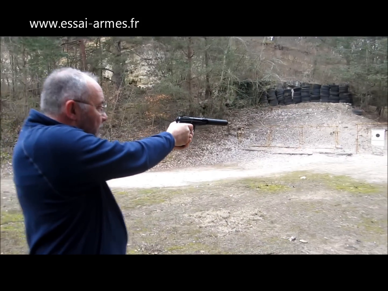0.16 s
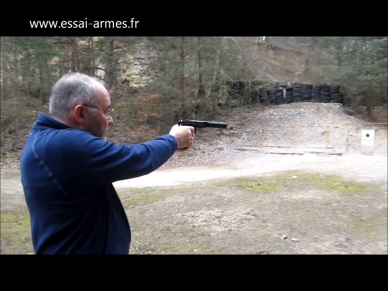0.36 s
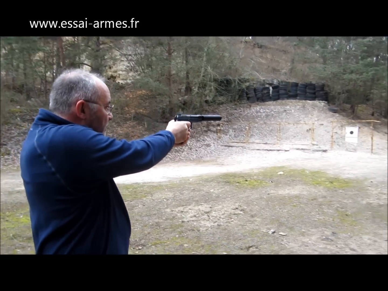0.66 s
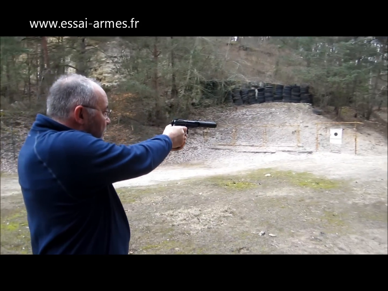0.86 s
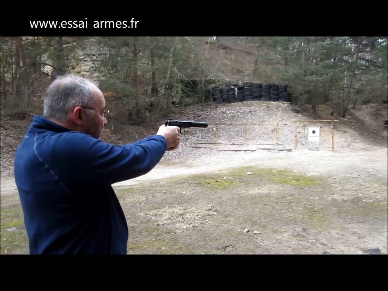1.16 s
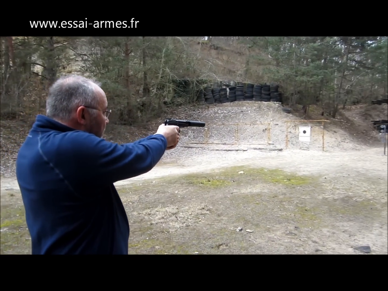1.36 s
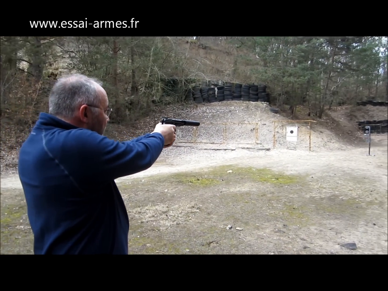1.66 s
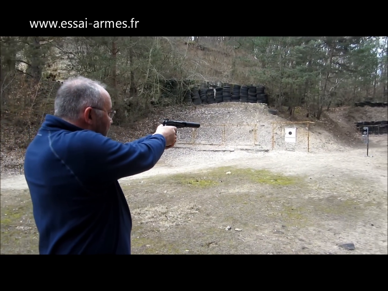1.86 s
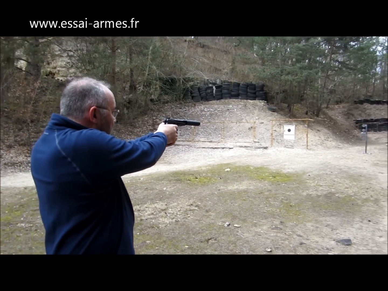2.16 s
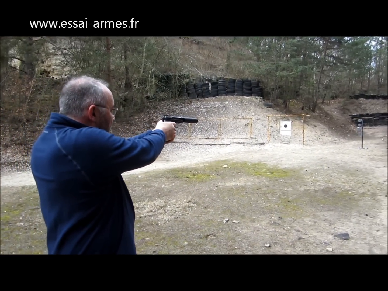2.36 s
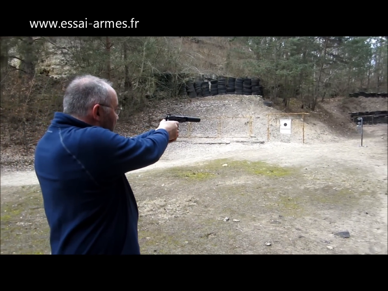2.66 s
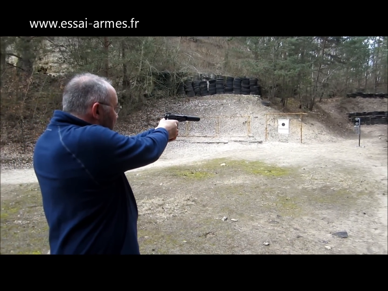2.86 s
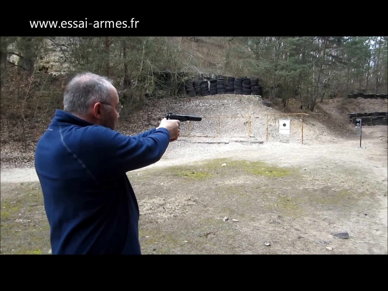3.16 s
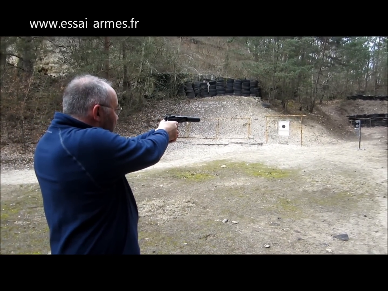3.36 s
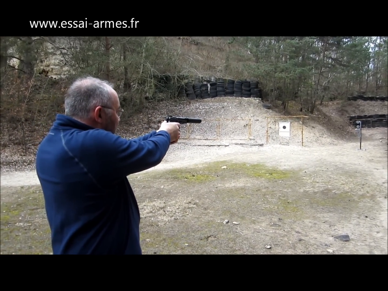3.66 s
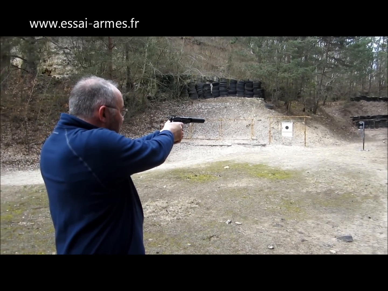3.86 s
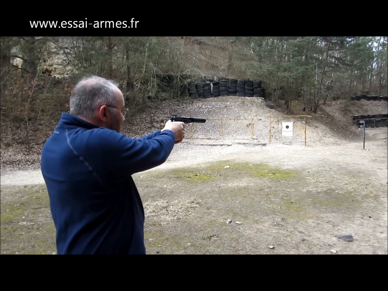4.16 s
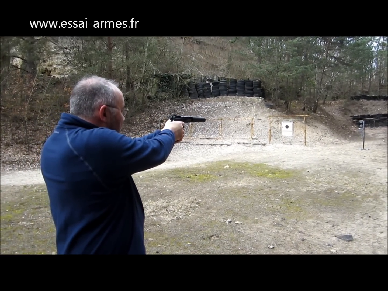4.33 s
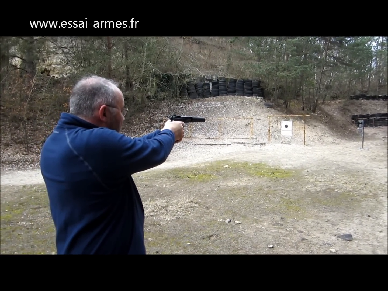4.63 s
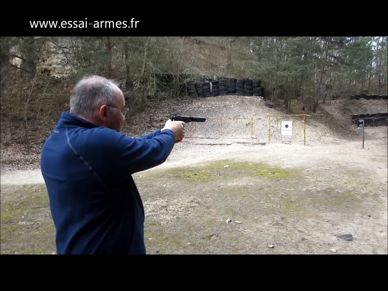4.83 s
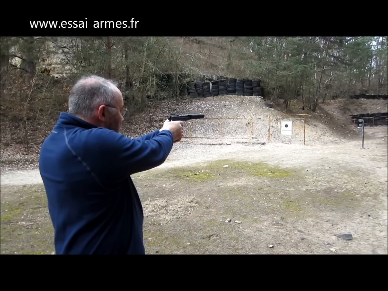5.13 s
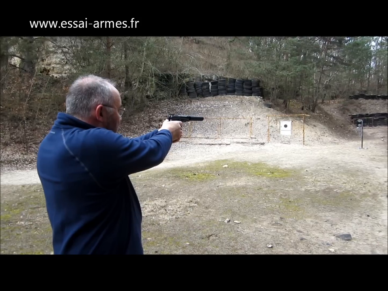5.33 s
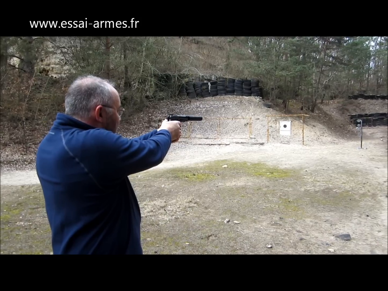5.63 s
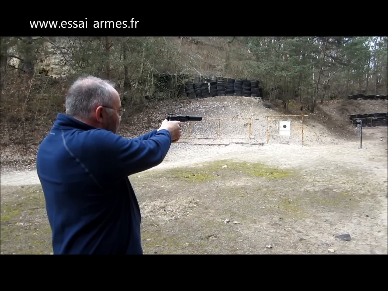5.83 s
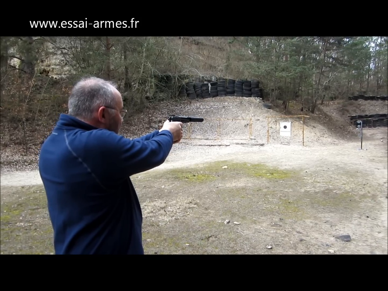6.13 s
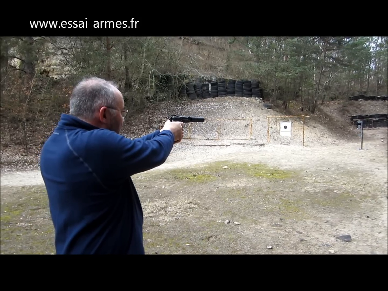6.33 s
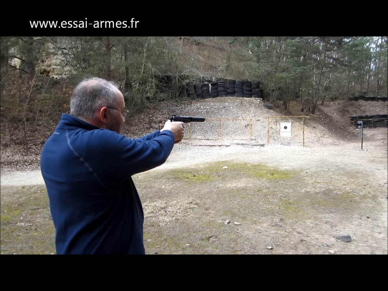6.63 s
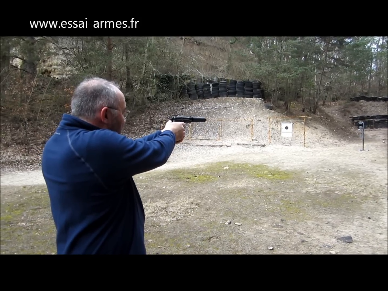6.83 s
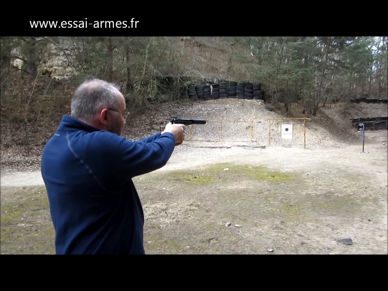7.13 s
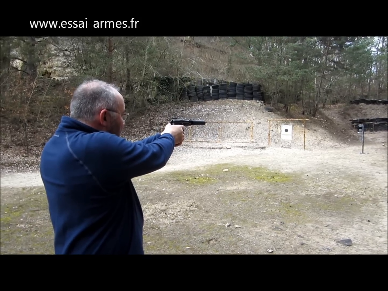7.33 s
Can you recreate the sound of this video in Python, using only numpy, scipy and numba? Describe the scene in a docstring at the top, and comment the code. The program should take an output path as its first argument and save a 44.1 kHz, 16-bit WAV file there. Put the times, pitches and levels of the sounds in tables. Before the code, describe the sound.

Close to the shooter outdoors, faint ticks, dull knocks and sleeve rubs lead to a sharp, hissing suppressed pistol shot with a metallic slide snap. About a tenth of a second later a bullet smacks steel, ringing high and shimmering, with woodland echo. A case drops on gravel. Two more shots follow at even spacing, over low wind and distant rush. Clipping blasts briefly push the background down.

```python
"""Outdoor range, microphone near the shooter: small ticks, knocks and a sleeve's rub come before the first shot.
Three times a suppressed pistol fires: noise bursts make the hammer, blast, venting gas and cycling slide.
A moment later each bullet splashes on a steel plate down range, whose paired sine modes ring and beat.
An earth bank and the woods answer in shaped noise, then a spent case drops and bounces on gravel close by.
Wind, far rush and a thin whine run throughout; the blast clips and the gain ducks, holds and recovers."""
import sys
import numpy as np
from scipy import signal
from scipy.fft import rfft, irfft, next_fast_len
from scipy.io import wavfile
from scipy.ndimage import uniform_filter1d, minimum_filter1d, map_coordinates
from numba import njit

SR = 44100
rng = np.random.default_rng(int(sys.argv[2]) if len(sys.argv) > 2 else 0)


def invert_db(x):
    """Field ratio 10**(x/20) for x, a level in decibels (scalar or array-like)."""
    u = np.asarray(x, float) / 20
    return 10 ** u


def unload_audio(sound):
    """Save the sound as a 16-bit wav file, at the path given as the first command line argument."""
    columns = np.transpose(np.atleast_2d(sound))
    # keep every value between -1 and 1, then stretch to whole-number steps
    steps = np.round(np.clip(columns, -1, 1) * 32767)
    wavfile.write(sys.argv[1], SR, steps.astype(np.int16))


N = 330309  # length in samples

# the three shots: shot_s, slide_closing_s, bullet_on_steel_s
SHOTS = [(.7124, .7434, .8263), (2.9962, 3.0258, 3.1097), (5.1773, 5.2068, 5.2918)]
# one shot, from hammer and firing pin through muzzle crack, baffle hiss, two chamber puffs and
# suppressor ring to the slide hitting its stop: delay_s, peak_db, centre_hz, width_hz, t60_s
SHOT_STAGES = [(-.004, -23, 7894, 9000, 0.01), (-.0016, -15, 3980, 6040, 0.011),
               (0, 16, 11030, 6915, 0.013), (0, 5.5, 4566, 3026, 0.017), (.0012, 11, 8228, 12050, .022),
               (.003, 11, 2400, 2400, 0.0067), (.0031, 2, 750, 550, .015), (.0031, -11.5, 150, 201.8, .04),
               (.0044, 11, 2400, 2400, 0.0063), (.0046, 12.5, 6050, 800, 0.008),
               (.0096, 13, 4987, 8000, .015), (.0097, 5.5, 10500, 3960, .016),
               (.0097, -4, 6970, 10020, .09), (.0098, -5, 10500, 600, .025), (.0098, -12, 5893, 600, .09),
               (.0098, -11, 3600, 500, .03)]
# gas jetting from the muzzle, then stopping: peak_db, centre_hz, width_hz, jet_s
GAS_JET = (9, 6000, 24000, .0062)
# the slide slams shut: peak_db, centre_hz, width_hz, t60_s
SLIDE_CLOSING = [(3, 3200, 2900, 0.0083), (2, 10500, 2800, 0.02), (1, 6000, 15000, 0.054),
                 (-10, 970, 1500, 0.013)]

# modes of the steel plate: mode_hz, t60_s, then relative level_db for the first, second and third bullet
PLATE_MODES = [(2030, .6, -50, -42, -26), (2354, .9, -50, -46, -27), (2422, 1.4, -48, -40, -25),
               (2972, .25, -46, -44, -14), (3065, .5, -40, -34, -30), (3880, .3, -38, -42, -30),
               (4072, .9, -21, -22, -42), (5266, .6, -22, -23, -26), (5408, .7, -38, -36, -17),
               (8194, .27, -14, -11, -20), (8302, .33, -2, -5, -9), (8630, .4, -30, -6, -22),
               (8955, .22, -36, -22, -11), (10557, .24, -30, -27, -31), (12678, .2, -31, -38, -26),
               (13462, .18, -21, -32, -40), (13708, .22, -31, -19, -22), (14610, .15, -28, -35, -23)]
# each bullet on the plate: splash_db (relative), echo_db, echo_tilt_db_per_octave
PLATE_BLOWS = [(7, 13, -0.5), (7, 15.5, -1), (5, 18, -1)]
# colour of lead splashing on steel: frequency_hz, relative_db
SPLASH_COLOUR = [(88, -57), (150, -8), (1150, -17), (4220, -5), (5770, -3.5), (8060, -4), (11900, -8),
                 (14500, -14), (16300, -34)]
# each mode is a close pair that beats: mean gap, its scatter, and the twin's level per kHz of pitch
TWIN_GAP_HZ, TWIN_SCATTER_HZ, TWIN_DB_PER_KHZ = 8.5, 1.5, -.9
# the struck plate starts slightly flat and settles
FLAT_SHARE, SETTLE_S = .002, .15
# the earth bank's answer: delay_s, peak_re_echo_db, centre_hz, width_hz, t60_s (negative: it swells)
EARTH_BANK = (0.02, -33, 3502, 5005, -0.6)

# how the woods' echo dies: frequency_hz, t60_s
WOODS_DECAY = [(300, 0.15), (1000, 1.1), (2500, 0.92), (5000, 0.8247), (10000, 0.56), (15000, 0.17)]
# colour of the woods' echo: frequency_hz, relative_db
WOODS_COLOUR = [(200, -23.5), (800, -12), (1400, -12.5), (2000, -1.5), (5000, 0.5), (10000, -1.5),
                (16000, -6.5)]
CLUMP_DB = 1.2  # the trees stand in clumps, so the echoes come unevenly

# spent cases landing and bouncing on gravel: landing_s, peak_db
CASES = [(1.028, -24.5), (1.2736, -49), (1.3724, -50), (3.306, -25), (3.5053, -42), (3.5746, -46),
         (5.5274, -21.5), (5.6454, -52)]
CASE_HZ, CASE_WIDTH_HZ = 10900, 4000
CASE_T60_S, CASE_LONGER_S_PER_DB = .021, .0005  # t60 at -15 dB; softer = shorter
# small bright ticks nearby: tick_s, peak_db, centre_hz
TICKS = [(.015, -40, 7000), (0.209, -50, 5000), (.3308, -35, 8000), (.3818, -48, 6000), (.418, -43, 8900),
         (1.62, -50, 6400), (1.6616, -52, 12800), (1.9036, -54, 12500), (1.9356, -45, 9500),
         (2.0986, -38, 3500), (2.4609, -40, 11030), (3.824, -36, 6000), (6.022, -46, 7600),
         (6.1048, -37.5, 9000)]
TICK_WIDTH, TICK_CYCLES = 0.83, 80  # width over centre, cycles to fall 60 dB
FAINT_TICKS, FAINT_DB, FAINT_HZ = 8, -54, 10500  # count, middle level and middle pitch
# dull knocks nearby: knock_s, peak_db, centre_hz
KNOCKS = [(.186, -45, 880), (0.2115, -38, 930), (.523, -46, 1500), (1.373, -37, 1300), (1.901, -32, 328)]
KNOCK_WIDTH, KNOCK_CYCLES = 0.78, 22  # width over centre, cycles to fall 60 dB
# two short hollow notes: note_s, peak_db
NOTES = [(2.02, -42), (2.052, -40.5)]
NOTE_HZ, NOTE_WIDTH_HZ, NOTE_T60_S = 1900, 500, 0.054

# rubs of the sleeve: middle_s, length_s, level_db
RUSTLE = [(0.03, 0.097, -58.5), (0.318, 0.113, -53.5), (0.397, .07, -51.5)]
# colour of the cloth: frequency_hz, relative_db
CLOTH_COLOUR = [(1500, -21), (4000, -2.5), (10000, -2.5), (16000, -6.0)]

# wind on the microphone: time_s, level_db
WIND = [(0, -56), (.35, -48.5), (1.25, -46), (1.58, -56), (1.72, -45), (2.2, -51.5), (2.6, -57), (3, -47),
        (3.4, -42), (3.7, -48.5), (4.55, -46.5), (5, -56.5), (5.25, -50.5), (5.45, -66), (6.1, -59.5),
        (6.45, -53), (6.95, -61), (7.49, -60)]
# colour of the buffeting: frequency_hz, relative_db
BUFFET_COLOUR = [(12, -15.0), (30, 3), (70, -6.5), (150, -20.5), (400, -47)]
GUST_DB, GUSTS_PER_S = 1.5, 5.5  # the slower of two wobbles in the wind
# colour of the far rush: frequency_hz, relative_db
RUSH_COLOUR = [(41, -23), (70, -3), (127, -4.5), (224, 1.5), (387, -1), (861, -0.5), (2240, -9),
               (7350, -22), (8050, -22.5), (13600, -32), (16300, -48)]
RUSH_DB, RUSH_SWELL_DB_PER_S = -50.5, 0.6129  # level at the start, and its steady rise
WHINE_HZ = 7865


def unit(x):
    """Scaled to rms 1."""
    return x / np.sqrt(np.mean(x ** 2) + 1e-20)


def along(points, hz):
    """Interpolates (Hz, value) points on a log frequency axis."""
    f, v = np.transpose(points)
    return np.interp(np.log(hz + 1), np.log(f + 1), v)


def level(rows):
    """Gain per sample from (s, dB) rows."""
    s, db = np.transpose(rows)
    return invert_db(np.interp(np.arange(N) / SR, s, db))


def wobble(rate):
    """A smooth random curve with rate knots a second."""
    knots = rng.standard_normal(int(N * rate / SR) + 4)
    return map_coordinates(knots, [np.arange(N) * rate / SR])


def filtered(x, response):
    """Multiplies the spectrum of x by a complex response of frequency."""
    m = next_fast_len(len(x) + 8192)
    return irfft(rfft(x, m) * response(np.fft.rfftfreq(m, 1 / SR)), m)[:len(x)]


def coloured(x, points):
    """Noise x shaped by (Hz, dB) points and scaled to rms 1."""
    return unit(filtered(x, lambda f: invert_db(along(points, f))))


def patchy(size, patchy_db):
    """Noise with random patches of gain in time and pitch."""
    z = signal.stft(rng.standard_normal(N), nperseg=size)[2]
    field = uniform_filter1d(rng.standard_normal(z.shape), size=9, axis=0)
    field = uniform_filter1d(field, size=4, axis=1)
    return signal.istft(z * invert_db(patchy_db * unit(field)), nperseg=size)[1][:N]


def add(track, s, sound):
    """Mixes a sound in at time s."""
    part = track[round(s * SR):][:len(sound)]
    part += sound[:len(part)]


def burst(db, hz, width_hz, t60, hold_s=0):
    """A sharp blow and a puff of noise through a steep resonance, 0.1 s long, set to a peak level."""
    t = np.arange(SR // 10) / SR
    puff = rng.standard_normal(len(t)) * invert_db(-60 * np.maximum(t - hold_s, 0) / t60)
    puff[0] += 3.5  # the blow itself

    def resonance(f):
        damping = 1j * f * width_hz
        return (damping / (hz * hz - f * f + damping)) ** 2

    rung = filtered(puff, resonance)
    return invert_db(db) * rung / np.max(np.abs(rung))


def pistol():
    """Hammer, blast, gas jet and slide as resonant noise bursts, with a faint echo of the woods."""
    track = np.zeros(N)
    for s, closing, _ in SHOTS:
        for delay, *stage in SHOT_STAGES:
            add(track, s + delay, burst(*stage))
        add(track, s, burst(*GAS_JET[:3], t60=.006, hold_s=GAS_JET[3]))
        for part in SLIDE_CLOSING:
            add(track, closing, burst(*part))
        add(track, s, invert_db(9.5) * woods(rise=0.0012, tilt_db=1.1))
    return track


def plate_ring(hz, t60, mode_db):
    """Each plate mode is a beating pair of sines, excited according to where the bullet struck."""
    t = np.arange(SR) / SR
    phase = rng.uniform(0, 2 * np.pi, hz.shape)
    knots = rng.standard_normal((len(hz), 60))
    # the swinging plate turns its lobes away and back: low modes dip most
    swing = np.array([map_coordinates(k, [t * 38]) for k in knots]) * 19000 / (hz + 1500)
    lag = FLAT_SHARE * SETTLE_S * (1 - np.exp(-t / SETTLE_S))
    turn = 2 * np.pi * hz * (t - lag) + phase + .45 * swing
    gap_hz = TWIN_GAP_HZ + TWIN_SCATTER_HZ * knots[:, -1:]
    twin = np.sin(turn + 2 * np.pi * gap_hz * (t - .04))  # in step at 40 ms
    pair = np.sin(turn) + invert_db(TWIN_DB_PER_KHZ * hz / 1000) * twin
    clang = invert_db(10.5 - hz / 900 - 60 * t / 0.091)  # short, under the bullet
    after_ring = invert_db(-22 - 60 * t / np.minimum(2.8 * t60, .95))
    fade = clang + invert_db(-60 * t / t60) + after_ring
    ring = np.sum(invert_db(mode_db - 1.5 * np.abs(swing)) * fade * pair, axis=0)
    return ring * (1 - np.exp(-t / 0.0026))  # the bending wave spreads over the plate


def lead_splash(db):
    """Lead splashes on steel: coloured noise with a quick decay and a weaker, slower one."""
    t = np.arange(SR) / SR
    fade = invert_db(-60 * t / 0.0176) + invert_db(-16.5 - 60 * t / 0.1)
    return coloured(rng.standard_normal(SR), SPLASH_COLOUR) * invert_db(db - 4.0) * fade


def earth_bank(echo_db):
    """The bank sends the strike back in one grainy clump of noise that swells, then stops."""
    _, peak_db, hz, width_hz, t60 = EARTH_BANK
    return burst(echo_db + peak_db, hz, width_hz, t60, hold_s=0.013)


def steel_plate():
    """Down range the bullet splashes and thuds, the plate rings, and the bank and woods answer."""
    track = np.zeros(N)
    hz, t60, *struck = np.transpose(PLATE_MODES)[:, :, None]
    for (_, _, s), (db, echo_db, tilt_db), mode_db in zip(SHOTS, PLATE_BLOWS, struck):
        ring = plate_ring(hz, t60, mode_db)
        add(track, s, lead_splash(db) + invert_db(-1.5) * ring)
        add(track, s, burst(db - 23.0, 300, 610, 0.012))  # the dull thud of the blow
        add(track, s + EARTH_BANK[0], earth_bank(echo_db))
        add(track, s, invert_db(echo_db) * woods(0.0025, tilt_db))
        add(track, s + .045, invert_db(echo_db - 9.5) * woods(0.004, tilt_db))  # the tree line answers later
        add(track, s, signal.fftconvolve(invert_db(-14.5) * ring, woods(0.016, tilt_db)))  # smeared ring
    return track


def woods(rise, tilt_db):
    """Scattered echoes of one blow, of energy 1, that build up and die at a rate set by pitch."""
    hz, t, z = signal.stft(rng.standard_normal(SR), SR, nperseg=256)
    colour_db = along(WOODS_COLOUR, hz) + tilt_db * np.log2(hz / 4000 + 0.081)
    decay_db = -60 * t / along(WOODS_DECAY, hz)[:, None]
    shape = invert_db(colour_db[:, None] + decay_db) * (1 - np.exp(-t / rise))
    clumps = uniform_filter1d(rng.standard_normal(z.shape), size=25, axis=0)
    clumps = uniform_filter1d(clumps, size=5, axis=1)
    shape = shape * invert_db(CLUMP_DB * unit(clumps))
    tail = signal.istft(z * shape, SR, nperseg=256)[1]
    return tail / np.linalg.norm(tail)


def spent_cases():
    """Cases hit gravel near the shooter: bright resonant bursts, shorter when softer."""
    track = np.zeros(N)
    for s, db in CASES:
        t60 = max(CASE_T60_S + CASE_LONGER_S_PER_DB * (db + 15), .005)
        add(track, s, burst(db, CASE_HZ, CASE_WIDTH_HZ, t60))
    return track


def small_ticks():
    """Placed ticks and a few faint ones at random times, each a broad resonant burst."""
    track = np.zeros(N)
    faint = []
    for when, size, pitch in rng.uniform(size=(FAINT_TICKS, 3)):
        faint.append((when * N / SR, FAINT_DB + 6 * (size - .5), FAINT_HZ * (.8 + .4 * pitch)))
    for s, db, hz in TICKS + faint:
        add(track, s, burst(db, hz, TICK_WIDTH * hz, TICK_CYCLES / hz))
    return track


def knocks_and_notes():
    """Dull knocks as broad low resonances, and two hollow notes as a narrower one."""
    track = np.zeros(N)
    for s, db, hz in KNOCKS:
        add(track, s, burst(db, hz, KNOCK_WIDTH * hz, KNOCK_CYCLES / hz))
    for s, db in NOTES:
        add(track, s, burst(db, NOTE_HZ, NOTE_WIDTH_HZ, NOTE_T60_S))
    return track


def cloth():
    """Each rub of the sleeve is patchy noise that swells and fades."""
    t = np.arange(N) / SR
    rubs = np.zeros(N)
    for s, length, db in RUSTLE:
        rubs += invert_db(db) * np.cos(np.pi * np.clip((t - s) / length, -.5, .5))
    return rubs * coloured(patchy(size=128, patchy_db=5), CLOTH_COLOUR)


def wind():
    """Air buffets the microphone: low noise made lumpy by two random wobbles."""
    low = filtered(rng.standard_normal(N), lambda f: invert_db(along(BUFFET_COLOUR, f)))
    gusts = invert_db(2.8 * wobble(12) + GUST_DB * wobble(GUSTS_PER_S))
    return level(WIND) * unit(low * gusts)


def far_rush():
    """A distant rush of patchy coloured noise that slowly rises."""
    swell = invert_db(RUSH_DB + RUSH_SWELL_DB_PER_S * np.arange(N) / SR)
    return swell * coloured(patchy(size=512, patchy_db=1.2811), RUSH_COLOUR)


def camera_whine():
    """A thin whine from the camera: one sine, unsteady in level and phase."""
    turn = 2 * np.pi * WHINE_HZ * np.arange(N) / SR + 1.2 * wobble(40)
    return invert_db(-68.0 + 1.8 * wobble(40)) * np.sin(turn)


def scene():
    """Everything at the microphone, on one channel."""
    shooting = pistol() + steel_plate()
    nearby = spent_cases() + small_ticks() + knocks_and_notes() + cloth()
    background = wind() + far_rush() + camera_whine()
    return (shooting + nearby + background)[None]


@njit
def ducking(need_db, attack, hold, release):
    """Gain cut in dB: quick to fall, held a while, slow to return."""
    cut = np.zeros(len(need_db))
    now, waited = 0.0, 0.0
    for i in range(len(need_db)):
        if need_db[i] > now:
            now += attack * (need_db[i] - now)
            waited = 0.0
        elif waited < hold:
            waited += 1
        else:
            now -= release * now
        cut[i] = now
    return cut


def low_pass(x):
    """Removes everything above the highest recorded frequency."""
    return signal.sosfilt(signal.butter(12, 16480, fs=SR, output="sos"), x)


def record(dry):
    """Gain control that reacts to loud peaks, then hiss, clipping and a treble roll-off."""
    peak = -minimum_filter1d(-np.abs(dry[0]), size=45, origin=22)  # largest over about 1 ms
    peak_db = 20 * np.log10(peak + 1e-9)
    need_db = np.clip(peak_db + 13.0, 0, 17)  # starts at -13 dB, cuts 17 dB at most
    attack_s, hold_s, release_s = 0.00073, .36, .6
    cut_db = ducking(need_db, 1 / (attack_s * SR), hold_s * SR, 1 / (release_s * SR))
    ducked = dry * invert_db(-cut_db)
    ducked = ducked + invert_db(-85.5) * rng.standard_normal(N)  # converter hiss, beyond the gain control
    clipped = ducked / (1 + np.abs(ducked) ** 8) ** (1 / 8)  # bends over close to full scale
    mix = filtered(clipped[0], lambda f: 1 / (1 + (f / 15400) ** 24))[None]
    return low_pass(mix)


dry = scene()
out = record(dry)
unload_audio(out)
```